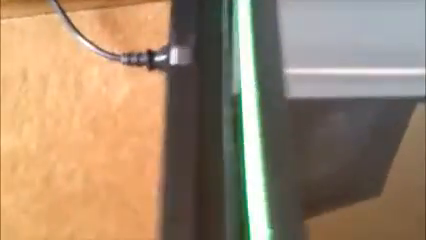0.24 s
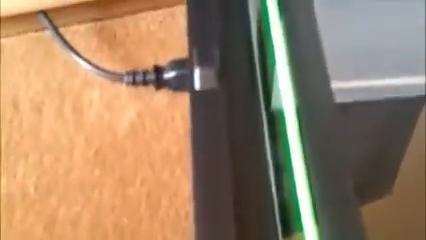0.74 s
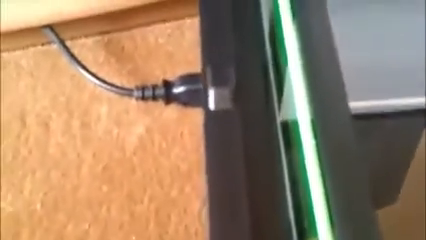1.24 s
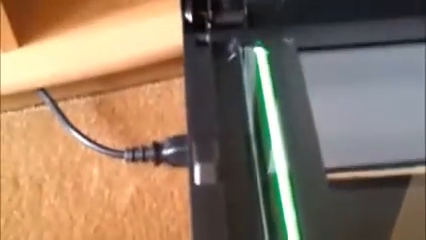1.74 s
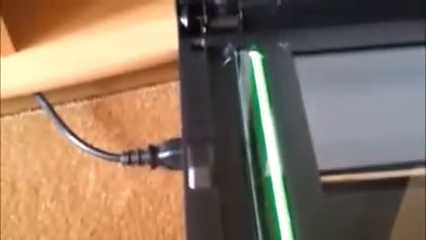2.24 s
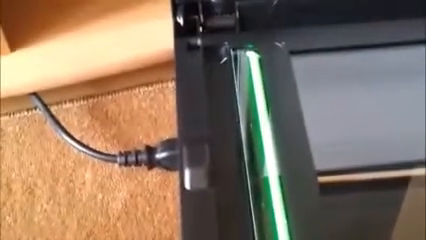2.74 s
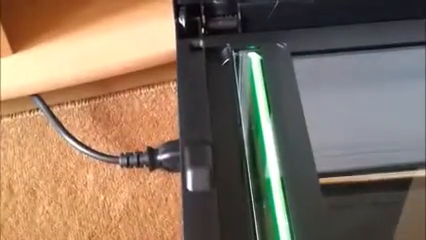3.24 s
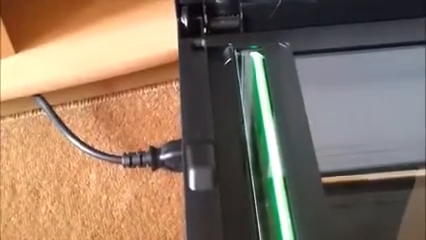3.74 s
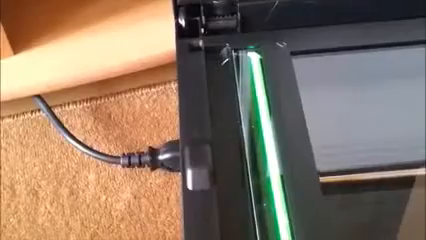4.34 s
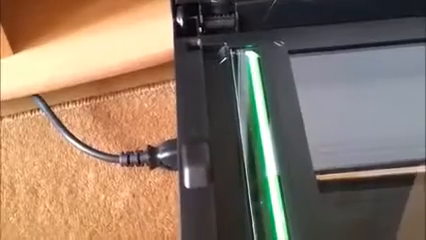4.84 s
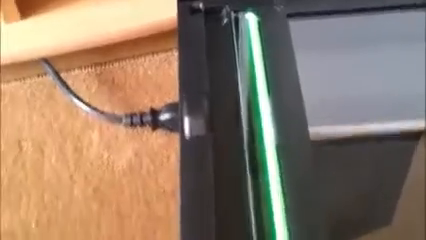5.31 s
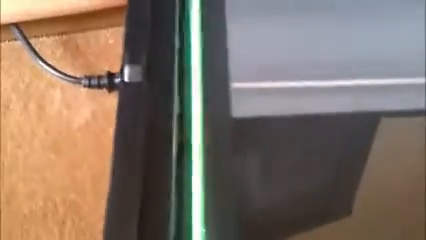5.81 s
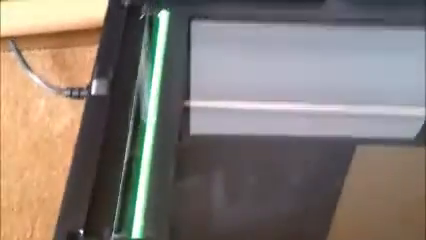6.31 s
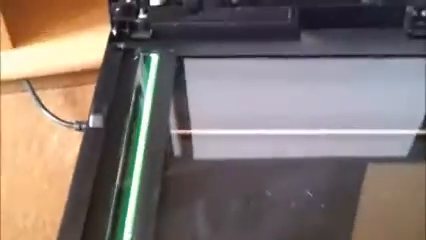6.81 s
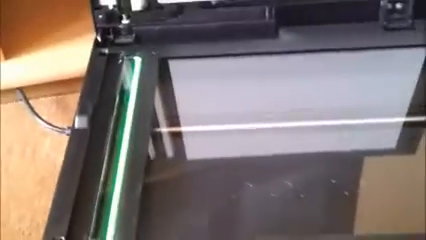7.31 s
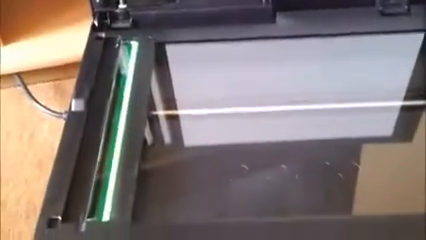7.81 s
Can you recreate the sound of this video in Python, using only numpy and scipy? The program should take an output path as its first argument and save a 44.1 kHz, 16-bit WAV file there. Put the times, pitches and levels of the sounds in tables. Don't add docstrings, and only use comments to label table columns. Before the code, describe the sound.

A jammed scanner drive rattles harshly about thirteen times a second, bright metallic tooth snaps over buzzing plastic and gear chatter, then abruptly stops.

```python
import sys
import numpy as np
from scipy import signal
from scipy.io import wavfile
from scipy.ndimage import uniform_filter1d

SR = 44100
rng = np.random.default_rng(int(sys.argv[2]) if len(sys.argv) > 2 else 0)


def field_ratio(decibels):
    return 10 ** (np.asarray(decibels, dtype=float) / 20)


def transcribe(signal):
    frames = np.atleast_2d(signal).T
    limited = np.clip(frames, -1, 1)
    pcm = np.round(limited * 32767).astype(np.int16)
    wavfile.write(sys.argv[1], SR, pcm)


N = 355440
T = np.arange(N) / SR
CYCLE_S, FIRST_S, SNAPS, STOP_S = .0754572, -.01399, 105, 7.86


def evened(x):
    return x / np.sqrt(np.mean(x ** 2) + 1e-20)


def filtered(x, order, kind, hz):
    return signal.sosfilt(signal.butter(order, hz, kind, fs=SR, output="sos"), x)


def read(points, hz):
    point_hz, value = np.transpose(points)
    return np.interp(np.log(hz + 1), np.log(point_hz + 1), value)


def curve(rows, s=T):
    at_s, value = np.transpose(rows)
    return np.interp(s, at_s, value)


def clicks(s, size):
    at, size = np.ravel(s) * SR, np.ravel(size)
    keep = (at >= 0) & (at < N - 2)
    at, size = at[keep], size[keep]
    whole, part = at.astype(int), at % 1
    return np.bincount(whole, size * (1 - part), N) + np.bincount(whole + 1, size * part, N)


def ring(x, modes, swell=4.23):
    t = np.arange(4096) / SR
    body = 0
    for hz, width_hz, level_db in modes:
        envelope = np.exp(-np.pi * width_hz * t) - np.exp(-np.pi * width_hz * swell * t)
        body = body + field_ratio(level_db) * envelope * np.sin(2 * np.pi * hz * t)
    body = filtered(body, 3, "high", 0.93 * modes[0][0])
    return signal.oaconvolve(x, body)[:N]


def drift(rate_hz):
    waves = [np.sin(2 * np.pi * (f * T + rng.random())) / np.sqrt(f) for f in np.geomspace(.1, 1, 12) * rate_hz]
    return evened(sum(waves))


def ports(x, right_db):
    return np.array([np.roll(x, 3), field_ratio(right_db) * x])


# (start_s, share_0_to_1)
DRAWN_BACK = [(0, .1), (1, 0.02), (2.4, 0.01), (4.7, 0.02), (5.4, 0.04), (6.2, 0.16), (6.9, 0.5), (7.7, 1)]
# (start_s, share_0_to_1)
FACING_DRIVE = [(0, 0.7), (.5, 0.36), (.9, .3), (1.4, 0.65), (2, 0.7), (2.5, 0.8), (3.2, 1), (4.2, 0.94),
                (4.7, 0.95), (5.1, .85), (5.6, 0.2), (6.2, 0.63), (6.6, 0), (7.3, 0.1), (7.8, 0.26)]
PART_LEVELS = {"motor": (-21.5, -1.8, 2.8, 0.93, 46), "rail": (-25.5, -1.1, 0.4, -2.1, 80),
               "bracket": (-36.5, 0, -3.5, 7, 30), "case": (-19.5, -13, 0.8, -0.74, 55),
               "lid": (-31, 4.5, 0.45, -0.5, 49), "coil": (-35.5, -6.5, .5, 2.5, 84)}


def heard(part):
    level_db, back_db, way, facing_db, fall_db_per_s = PART_LEVELS[part]
    moved_db = back_db * np.clip(curve(DRAWN_BACK) / way, 0, 1) + facing_db * curve(FACING_DRIVE)
    return level_db + moved_db - fall_db_per_s * np.maximum(T - STOP_S, 0)


# (after_snap_s, level_db)
GEAR_LOAD = [(0, -4), (.004, -2), (.014, -8), (.03, -11), (.038, -1), (.056, 0), (.064, -4), (.0754, -5)]


def load_db(after_snap_s=(T - FIRST_S) % CYCLE_S):
    return curve(GEAR_LOAD, after_snap_s)


def cycles():
    return FIRST_S + CYCLE_S * np.arange(-1, N / SR / CYCLE_S + 1)


# (pitch_hz, width_hz, left_db, right_db)
RAIL_MODES = [(3772, 100, -4, -3.5), (4880, 176, 0.5, -7.5), (4860, 200, -15, -29), (5250, 430, 5, -2),
              (5173, 180, 4.5, -8), (5463, 285, 13.5, -2), (5770, 230, 1.5, -41), (6214, 216, 7, -39),
              (7090, 290, -1, -43), (7370, 2300, 1, -31), (8310, 680, -37, 0)]
# (pitch_hz, width_hz, left_db, right_db)
BRACKET_MODE = (4160, 155, 10, -9)
# (after_snap_s, level_db)
TOOTH_BOUNCES = [
    (-.0002, -4.5),
    (.0002, 4),
    (.0028, 4.5),
    (.0051, -1),
]


def snap():
    s, level_db = np.transpose(TOOTH_BOUNCES)
    chance = rng.standard_normal((SNAPS, len(s) + 1, 2))
    wander = drift(1.5)[np.arange(SNAPS) * (N // SNAPS), None]
    start_s = cycles()[1:SNAPS + 1, None] + .00002 * chance[:, -1:, 0] + .00012 * wander
    hit_db = level_db + 1.6 * chance[:, :-1, 1] + .9 * chance[:, -1:, 1]
    hits = clicks(start_s + s + .000018 * chance[:, :-1, 0], field_ratio(hit_db))
    sides = [ring(hits, [(m[0], m[1], m[2 + k]) for m in RAIL_MODES]) for k in (0, 1)]
    rail = np.array([sides[0], np.roll(sides[1], -3)])
    bracket = ring(hits, [BRACKET_MODE[:3]]) * field_ratio(np.array(BRACKET_MODE[2:])[:, None])
    puff = signal.oaconvolve(hits, np.exp(-np.arange(600) / SR / .003))[:N]
    spit = filtered(puff * rng.standard_normal((2, N)), 2, "high", 6500)
    rail_db = heard("rail")
    out = evened(rail) * field_ratio(rail_db + 6.5)
    out += evened(bracket) * field_ratio(heard("bracket") + 4.0 + .8 * drift(12))
    return out + evened(spit) * field_ratio(rail_db - 20 + 5.1 * drift(9))


# (after_snap_s, base_db, case_db, gear_db)
MOTOR_STEPS = [(.0008, -38, -7.5, -4), (.0055, -4, -9.5, -1.5), (.0145, -2, -13.5, 3.5),
               (.025, -8.5, -10.5, 9), (.0352, -6, -4, 5.5), (.0395, -0.5, -9, -6), (.0432, 2, -8.5, -4),
               (.0478, -18.5, -4, 1.5), (.0538, -27.5, 1.5, -3.5), (.0652, -10.5, -4, -12.5),
               (.0702, -10, -0.5, 1)]
# (pitch_hz, width_hz, level_db)
BASE_MODES = [(154, 7.4, -44), (175.5, 11.1, -3.5), (247, 8.9, -4.5), (270, 52, 4), (281, 17.3, -8),
              (317.3, 3.9, -19), (380.6, 19, -5)]
# (pitch_hz, width_hz, level_db)
CASE_MODES = [(463, 35, -15), (499, 24, 6.5), (565.2, 83, 28), (590, 39, 6), (621, 26, -53.5)]
# (pitch_hz, width_hz, level_db)
LID_MODES = [(341, 25.5, -6.5), (413.7, 35, -1), (668, 142, 5), (740, 76, -4), (845, 162, 3.5),
             (978.6, 168, 6)]
# (pitch_hz, width_hz, level_db)
GEAR_MODES = [(1040, 136, 0), (1156, 143, 0), (1275.6, 77, -3.5), (1414, 112, -1), (1512, 140, 2.5),
              (1644, 138, -0.5), (1953, 108, -2.5), (2053, 133, -5), (2156, 195, 0.5), (2450, 68, -12),
              (2867, 112, -5), (3170, 190, -10)]


def steps():
    s, base_db, case_db, gear_db = np.transpose(MOTOR_STEPS)
    chance = rng.standard_normal((len(cycles()), len(s), 4))
    at = cycles()[:, None] + s
    stopped = at > STOP_S
    pushes = clicks(at + .00008 * chance[..., 0], field_ratio(base_db + 0.97 * chance[..., 1] - 9.8 * stopped))
    base = ring(pushes, BASE_MODES, swell=8.5)
    blows = clicks(at + .00006 * chance[..., 0], field_ratio(case_db + 1.2 * chance[..., 2] - 10 * stopped))
    meshed_db = load_db(s) - 30 * stopped
    rattle = clicks(at + .00004 * chance[..., 0], field_ratio(gear_db + meshed_db + 2.6 * chance[..., 3]))
    gears = ring(rattle + .7 * np.roll(rattle, 37) - .6 * np.roll(rattle, 83), GEAR_MODES, swell=3.5)
    panels = evened(ring(blows, CASE_MODES)) * field_ratio(heard("case") + 1.1)
    panels += evened(ring(blows, LID_MODES)) * field_ratio(heard("lid") + 1.0)
    motor_db = heard("motor")
    out = ports(evened(base) * field_ratio(motor_db - 5.5), -3.5) + ports(panels, -4.0)
    return out + ports(evened(gears) * field_ratio(motor_db - 4.0), -7.5)


def chatter():
    load = field_ratio(np.where(T > STOP_S, -3.5, load_db()))
    size = rng.choice([-1., 1.], (3, N)) * field_ratio(2.6 * np.minimum(rng.exponential(1, (3, N)), 5))
    knocks = load * size * (rng.random((3, N)) < 1500 / SR)
    pair = [knocks[0] + 1.13 * knocks[1], np.roll(knocks[0], -3) + 0.64 * knocks[2]]
    gears = np.array([ring(side, GEAR_MODES) for side in pair])
    case = ports(ring(knocks[0], CASE_MODES), -1.5)
    lid = ports(ring(knocks[0], LID_MODES), -3.0)
    damped = [[(m[0], 4.05 * m[1], m[2 + k]) for m in RAIL_MODES] for k in (0, 1)]
    rail = np.array([ring(side, modes) for side, modes in zip(pair, damped)])
    out = evened(gears) * field_ratio(heard("motor") + np.array([[-2.2], [-5.5]]))
    out += evened(case) * field_ratio(heard("case") - 7)
    out += evened(lid) * field_ratio(heard("lid") + 2.0)
    return out + evened(rail / load ** .45) * field_ratio(heard("rail") - 3.6)


def whine():
    whine_hz = 2557.8
    turn = 2 * np.pi * (T - FIRST_S) / CYCLE_S
    throb = 1 + .55 * np.exp(-1j * (2 * turn - 2.3))
    throb = throb + .25 * np.exp(1j * (turn - 2.1)) + .2 * np.exp(1j * (2 * turn - 1.7))
    tone = (throb * np.exp(2j * np.pi * whine_hz * T + .25j * drift(3.5))).real
    return ports(evened(tone) * field_ratio(heard("coil") + 6.0 + 1.0 * drift(5)), -20.0)


# (centre_s, level_db, half_length_s)
PANEL_SWELLS = [
    (.365, -7.5, 0.0088),
    (0.418, -6, 0.029),
    (0.485, -16, 0.02),
    (0.581, -7, 0.047),
    (0.672, -12.5, .016),
    (0.707, -18, .022),
]


def moan():
    moan_hz, sag_from_s, sag_hz_per_s = 615, 0.52, 290
    hz = moan_hz - sag_hz_per_s * np.clip(T - sag_from_s, 0, .3)
    turn = 2 * np.pi * np.cumsum(hz * (1 + 0.007 * drift(40))) / SR
    tone = np.sin(turn) + field_ratio(-25) * np.sin(2 * turn) + field_ratio(-20.5) * np.sin(3 * turn)
    swells = sum(field_ratio(level_db) * np.exp(-((T - s) / half_s) ** 2) for s, level_db, half_s in PANEL_SWELLS)
    return ports(tone * swells * field_ratio(1.4 * drift(46.1)), -2.5)


# (start_s, level_db)
COAST_KNOCKS = [
    (7.883, -2),
    (7.945, -2),
    (7.995, 0),
]


def coast():
    s, level_db = np.transpose(COAST_KNOCKS)
    knocks = ring(clicks(s, field_ratio(level_db)), BASE_MODES, swell=8.3)
    return ports(knocks / abs(knocks).max() * field_ratio(-20.5), -5.5)


# (pitch_hz, level_db_per_hz)
HUM_SPECTRUM = [(20, -17.5), (110, -34), (200, -9), (260, -24), (350, -17), (560, -24), (800, -17.5),
                (2400, -15.5), (3100, -13.5), (5300, -18.5), (7000, -18.5), (9500, -32.5), (14500, -100),
                (15500, -71)]
# (pitch_hz, likeness_0_to_1)
HUM_LIKENESS = [(60, .15), (130, 0.64), (300, 0.97), (700, 0.97), (1500, 1), (4000, 0.9)]
# (pitch_hz, level_db)
HUM_LEAN = [(60, 29.5), (700, -25.5), (2400, -3), (5000, 2), (9000, -11), (15000, -62)]


def hum():
    frames, hz = N // 128 + 5, np.fft.rfftfreq(512, 1 / SR)
    a, b, c, d, patches = rng.standard_normal((frames, 257, 5)).T
    patches = evened(uniform_filter1d(uniform_filter1d(patches, 6, 0), 10, 1))
    same = np.clip(read(HUM_LIKENESS, hz), -1, 1)[:, None]
    half_lean_db = read(HUM_LEAN, hz)[:, None] / 2
    left = a + 1j * b
    right = same * left + np.sqrt(1 - same ** 2) * (c + 1j * d)
    late = np.exp(-6j * np.pi * hz / SR)[:, None]
    z = np.array([left * field_ratio(half_lean_db) * late, right * field_ratio(-half_lean_db)])
    z *= field_ratio(read(HUM_SPECTRUM, hz)[:, None] + 3.8 * patches)
    blur = signal.istft(z, nperseg=512, noverlap=384)[1][:, :N]
    return evened(blur) * field_ratio(heard("motor") - 5 + .5 * load_db())


# (pitch_hz, t60_s)
ROOM_DECAY = [(200, 0.19), (1000, 0.075), (4000, 0.27), (12000, 0.04)]


def room(x):
    out, size = np.zeros((2, N)), SR // 2
    slots = np.arange(120, size - 20, 20)
    for k in range(3):
        taps = np.zeros((2, size))
        at = slots + rng.integers(0, 20, (2, len(slots)))
        np.put_along_axis(taps, at, rng.choice([-1., 1.], at.shape), 1)
        hz, t, z = signal.stft(taps, SR, nperseg=256)
        decay_db = -60 * t / read(ROOM_DECAY, hz)[:, None]
        tail = signal.istft(z * field_ratio(decay_db), SR, nperseg=256)[1]
        tail = tail / np.linalg.norm(tail[0])
        share = np.sqrt(2 / 3) * np.cos(2 * np.pi * (T / 5.24 + k / 3))
        out += signal.oaconvolve((x * share)[None], tail, axes=1)[:, :N]
    return out


def scene():
    bright = snap() + whine()
    dull = steps() + chatter() + moan() + coast()
    sent = field_ratio(-12.0) * bright.mean(0) + field_ratio(-10.5) * dull.mean(0)
    return bright + dull + room(sent) + hum()


def band_limit(x):
    return signal.sosfilt(signal.butter(12, 15970, fs=SR, output="sos"), x)


def record(dry):
    hiss_db, lift_db_per_s = -45.5, 65
    hiss_db = hiss_db + 1.0 * drift(5) + 3.8 * curve(DRAWN_BACK) + lift_db_per_s * np.maximum(T - STOP_S, 0)
    hiss = field_ratio(hiss_db) * filtered(rng.standard_normal(dry.shape), 2, "high", 7000)
    rumble = filtered(rng.standard_normal(dry.shape), 2, "low", 70)
    rumble *= field_ratio(np.array([[-31], [-33.5]]) + 3.5 * drift(8))
    mix = filtered(dry, 2, "high", 130) + hiss + rumble
    soft = mix / (1 + abs(mix / 1.05) ** 6) ** (1 / 6)
    low_pass = signal.firwin(255, 14800, window=("kaiser", 7.5), fs=SR)
    return band_limit(signal.oaconvolve(soft, low_pass[None], "same"))


dry = scene()
out = record(dry)
transcribe(out)
```